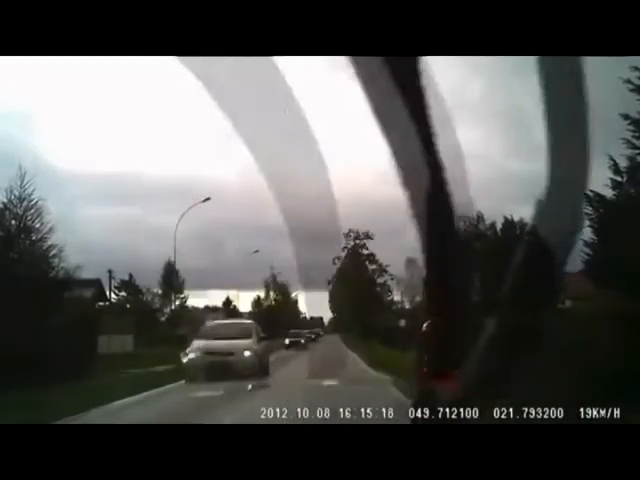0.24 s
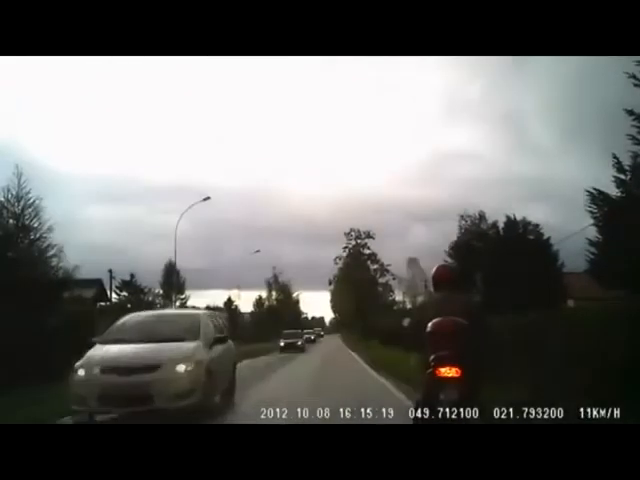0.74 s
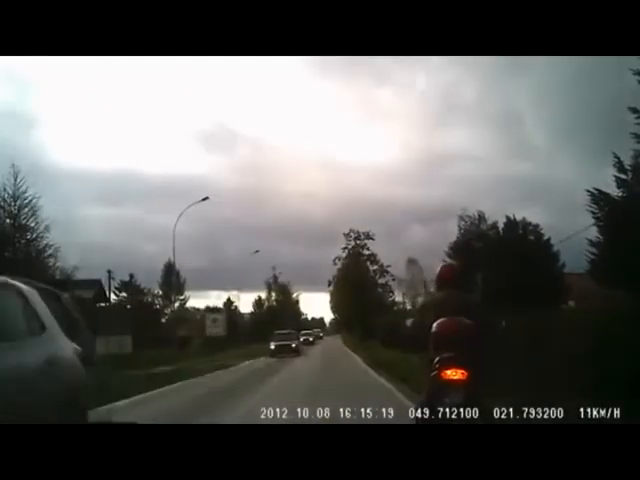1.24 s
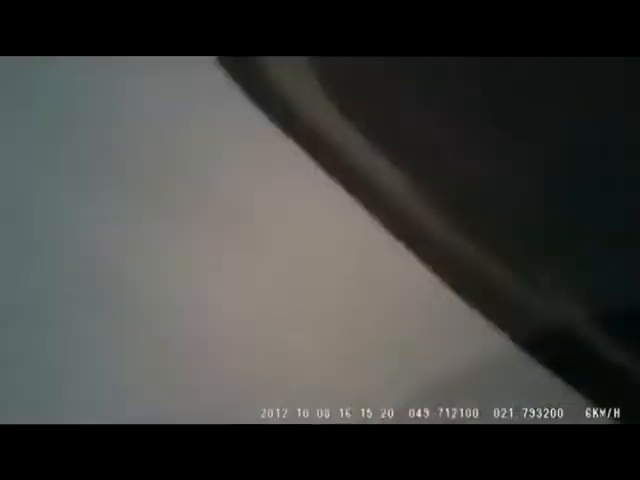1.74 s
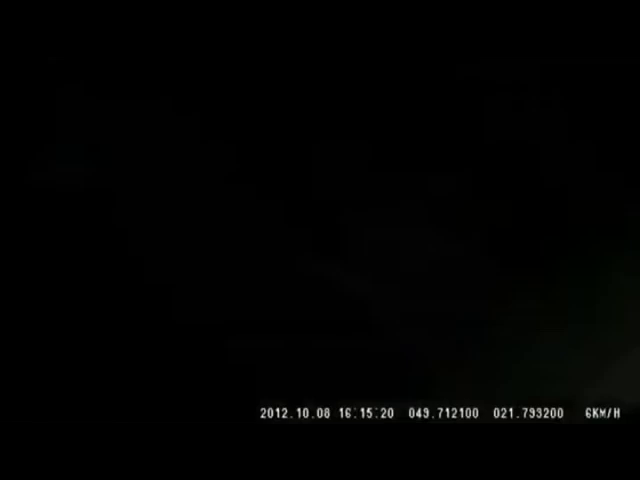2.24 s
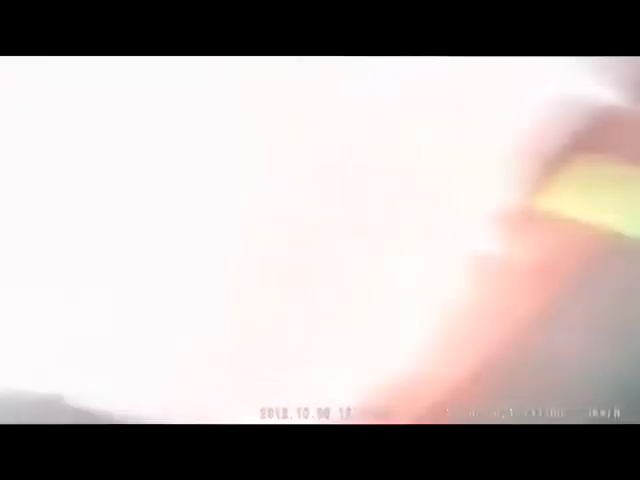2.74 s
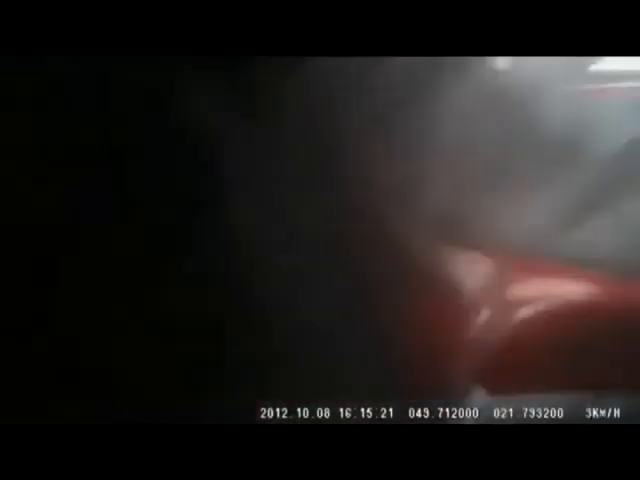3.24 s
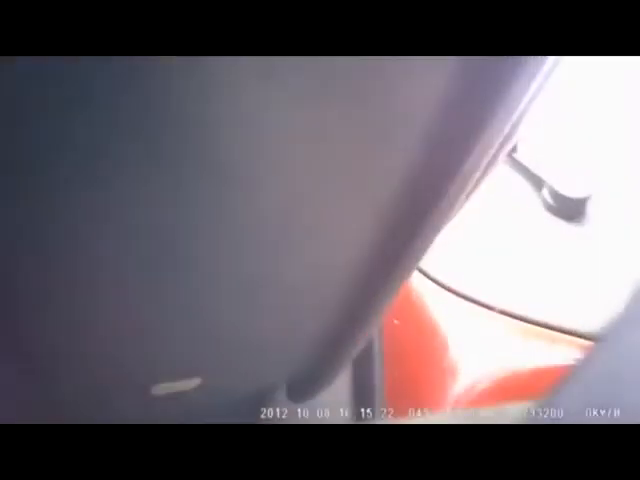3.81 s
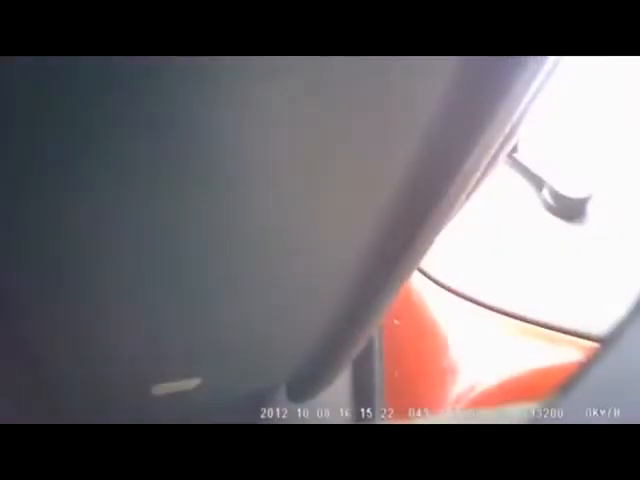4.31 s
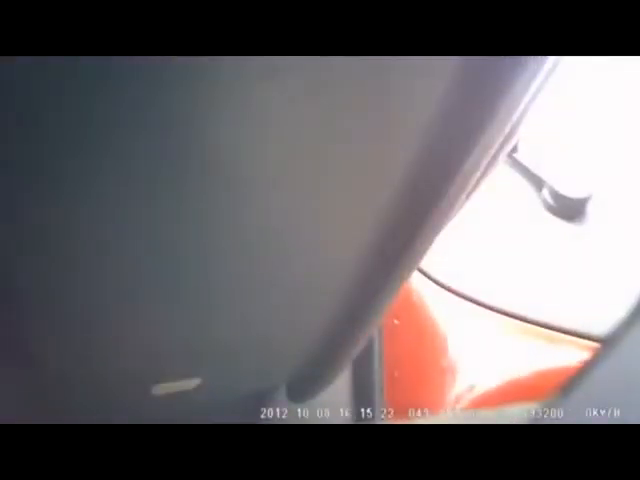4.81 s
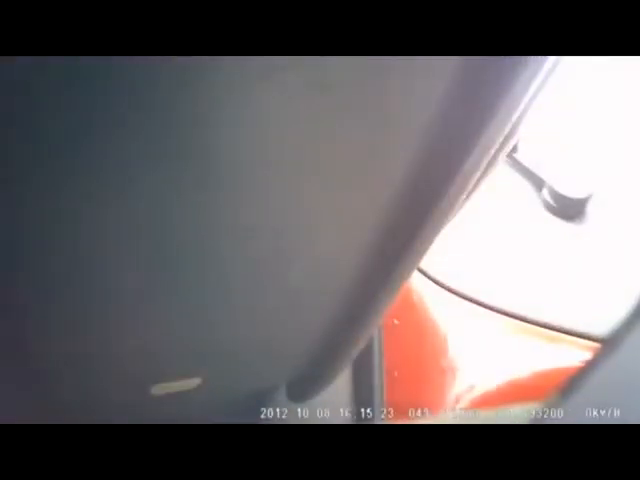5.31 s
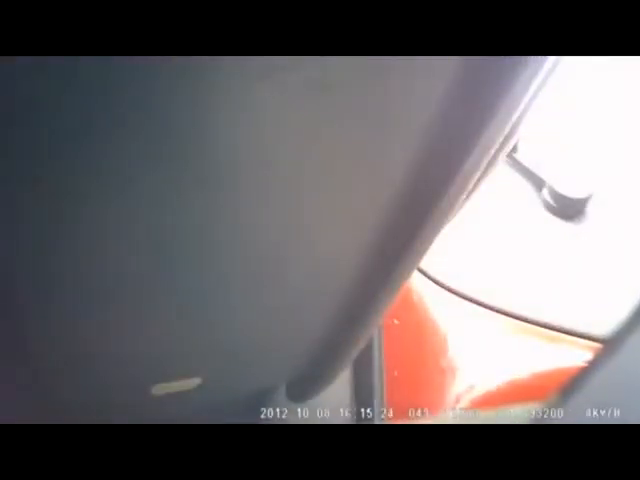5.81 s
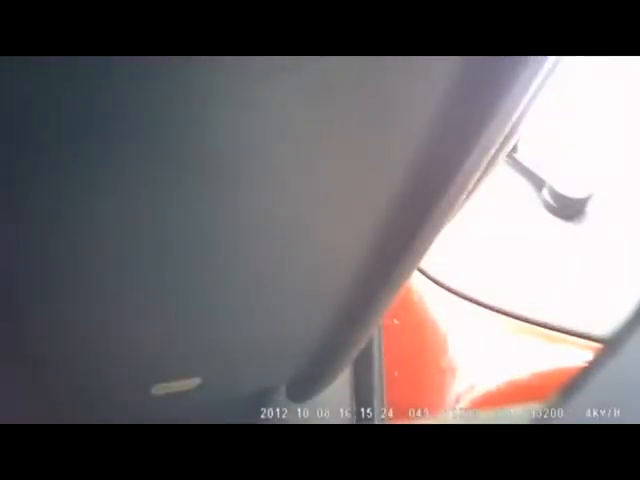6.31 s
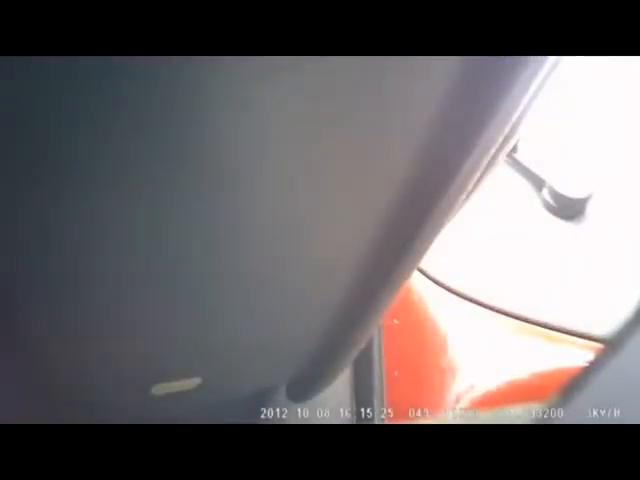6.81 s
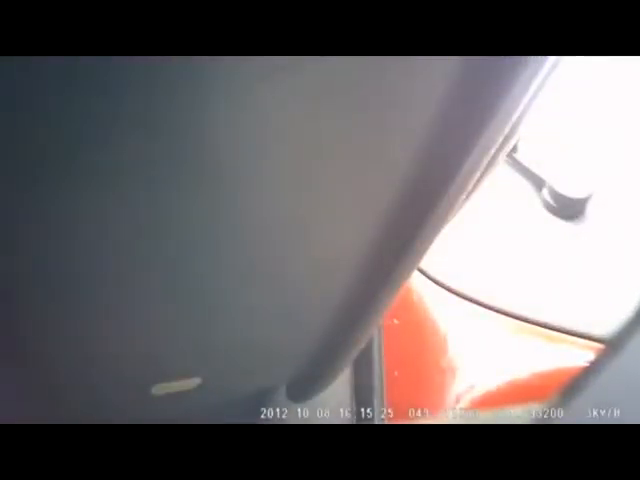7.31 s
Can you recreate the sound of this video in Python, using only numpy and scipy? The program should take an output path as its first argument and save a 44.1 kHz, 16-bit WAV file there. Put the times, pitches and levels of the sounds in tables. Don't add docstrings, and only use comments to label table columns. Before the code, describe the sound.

A small, muffled microphone on a car windscreen hears low road rumble and steady engine throb. From 0 to 0.35 s wiper rubber judders over the glass, ending in a solid thump at 0.37 s with small trim ticks. At 1.1 s a brief glancing blow drums a door panel and scrapes metal, quickly fading. A little more judder, then at 1.84 s the crash: deep slams, booming shell, panels folding and ringing, dense debris rattle, plastic snaps and close hard knocks as the camera tumbles, heavily clipped. A short rising metal squeal comes near 2.95 s. The clatter continues in bursts until 3.8 s, dwindling to knocks and clicks by 4.05 s. Small rubber squeaks follow at 4.1-4.25 s. Then quiet low idling, faint motor whine and belt hiss, with dull wiper thumps about every half second from 4.55 s, a few ticks and a very faint creak near 5.6 s until the end.

```python
import sys
import numpy as np
from scipy import signal
from scipy.fft import rfft, irfft, next_fast_len
from scipy.io import wavfile
from scipy.ndimage import uniform_filter1d

SR = 44100
rng = np.random.default_rng(int(sys.argv[2]) if len(sys.argv) > 2 else 0)


def master(y):
    cut = np.clip(np.atleast_2d(y).T, -1, 1)
    pcm = np.round(cut * 32767)
    wavfile.write(sys.argv[1], SR, pcm.astype(np.int16))


def rack_gain(trim_db):
    fader = np.asarray(trim_db, float)
    return 10 ** (fader / 20)


N = 332955
TIME_S = np.arange(N) / SR
CRASH_S, AT_REST_S = 1.835, 4.05


def noise(n=N):
    return rng.standard_normal(n)


def unit(x):
    return x / np.sqrt(np.mean(x ** 2))


def shaped(x, points):
    hz, db = np.transpose(points)
    size = next_fast_len(N)
    log_hz = np.log(np.maximum(np.arange(size // 2 + 1) * SR / size, 1))
    gain = rack_gain(np.interp(log_hz, np.log(hz), db))
    return irfft(rfft(x, size, axis=-1) * gain, size, axis=-1)[..., :N]


def band(x, hz, width_hz):
    return signal.lfilter(*signal.iirpeak(hz, hz / width_hz, fs=SR), x)


def band_twice(x, hz, width_hz, outer_width_hz):
    return band(band(x, hz, width_hz), hz, outer_width_hz)


def walk(rate_hz):
    hold = int(SR / rate_hz)
    steps = np.repeat(noise(N // hold + 1), hold)
    return 1.25 * uniform_filter1d(steps, hold)[:N]


def grit(spread_db, rate_hz):
    return unit(noise() * rack_gain(spread_db * walk(rate_hz)))


def smooth_noise(n, size):
    return unit(uniform_filter1d(noise(n), size=size))


def sweep(hz):
    return np.sin(2 * np.pi * np.cumsum(hz) / SR)


def add(out, start_s, x):
    i = int(start_s * SR)
    out[i:i + len(x)] += x[:N - i]


def swell(peak_s, peak_db, rise_db_s, fall_db_s):
    late_s = TIME_S - peak_s
    return rack_gain(peak_db + np.minimum(rise_db_s * late_s, -fall_db_s * late_s))


# start_s, road_db, firing_hz
CABIN = [
    (0, -44.5, 23.8),
    (.2, -49, 24.8),
    (.72, -46.5, 24.7),
    (1.3, -47, 25.6),
    (1.6, -45, 26),
    (1.82, -37, 27.6),
    (4.05, -44, 27.7),
    (4.59, -49, 27.9),
    (7.55, -52, 27.3),
]
# hz, density_db
ROAD_COLOUR = [(50, -38), (85, -11), (108, -15.5), (135, -7), (217, -4.5), (388, -11.5), (509, -8.5),
               (793, -16.5), (1440, -23.5), (1570, -19), (3050, -28.5), (4290, -35), (5000, -56),
               (6500, -92), (11000, -120)]
# multiple, relative_db
HIGHER_ORDERS = [(3, -13.5), (5, -11)]
# pitch_hz, level_db
MOTOR_WHINE = [(360.7, -54.5), (745, -63)]


def cabin():
    start_s, road_db, firing_hz = np.transpose(CABIN)
    road_db = np.interp(TIME_S, start_s, road_db)
    firing_hz = np.interp(TIME_S, start_s, firing_hz)
    flicker = 0
    for hz in 80 * 2. ** np.arange(7):
        flicker = flicker + band_twice(grit(150 / (hz + 40), 16), hz, hz, hz)
    road = rack_gain(road_db) * unit(shaped(flicker, ROAD_COLOUR))

    first_db = np.where(TIME_S < CRASH_S, -52, -46.5)
    second_db = np.where(TIME_S < CRASH_S, -57.5, -48)
    turn = 2 * np.pi * np.cumsum(firing_hz * (1 + 0.016 * walk(25.34))) / SR
    orders = [(1, first_db), (2, second_db)]
    orders += [(multiple, first_db + db) for multiple, db in HIGHER_ORDERS]
    engine = rack_gain(first_db - 6) * unit(band(noise(), 38, 25))
    for multiple, db in orders:
        engine = engine + np.sqrt(2) * rack_gain(db + 1.7 * walk(6)) * np.sin(multiple * turn)

    whine = np.zeros(N)
    for hz, db in MOTOR_WHINE:
        tone = unit(band_twice(noise(), hz, 23, 33)) / 1.49
        whine += np.sqrt(2) * rack_gain(db + walk(5.5)) * tone
    return road + engine + whine * (TIME_S > AT_REST_S)


# start_s, length_s, level_db, pitch_hz
JUDDER = [
    (0, 0.12, -39.5, 185),
    (0.051, 0.036, -36.5, 280),
    (0.095, 0.051, -38, 300),
    (0.117, 0.05, -38, 236),
    (0.163, 0.058, -35.5, 278),
    (0.201, 0.12, -45.5, 230),
    (0.333, 0.03, -37, 332),
    (1.737, 0.017, -38.5, 200),
    (1.776, 0.011, -39, 223),
    (1.796, 0.046, -39, 179),
]


def judder():
    out, t = np.zeros(N), np.arange(SR // 6) / SR
    for start_s, length_s, level_db, pitch_hz in JUDDER:
        slip = unit(band_twice(noise(len(t)), pitch_hz, 55, 294))
        slip += 0.8 * unit(band(band(noise(len(t)), 550, 160), 330, 260))
        slip *= np.sin(np.pi * np.minimum(t / length_s, 1)) ** 0.6
        add(out, start_s, rack_gain(level_db + 9.5) * slip / np.abs(slip).max())
    return out


# start_s, peak_db, ring_hz, click_minus_thump_db
THUMPS = [
    (0.364, -19, 217, -49.5),
    (0.388, -34, 300, -35),
    (4.545, -24, 174, -33),
    (5.123, -40, 51.1, -23),
    (5.487, -29.5, 183, -41.5),
    (5.538, -35, 62.7, -31),
    (5.923, -34.5, 375, -36.5),
    (6.438, -25.5, 176, -23.5),
    (6.899, -36.5, 151, -25),
    (7.386, -28.5, 187, -21),
]


def wiper_thumps():
    out, t = np.zeros(N), np.arange(SR // 6) / SR
    rebound_s, rebound_db = 0.035, -13.5
    blow = np.exp(-(t / 0.015) ** 2)
    blow += rack_gain(rebound_db) * np.exp(-((t - rebound_s) / 0.013) ** 2)
    sagging_t = t + 0.00071 * (1 - np.exp(-t / 0.0021))
    for start_s, peak_db, ring_hz, click_db in THUMPS:
        a, b = noise((2, len(t)))
        thump = np.sin(2 * np.pi * ring_hz * sagging_t) * blow
        scuttle = 0.36 * unit(band(band(a, 150, 87), 160, 200))
        scuttle += 0.26 * unit(band(band(b, 356, 210), 300, 700))
        scuttle *= np.minimum(t / 0.0064, 1) * np.exp(-t / 0.029)
        click = unit(band_twice(b, 1300, 1800, 2500)) * np.exp(-t / 0.018)
        add(out, start_s + 0.00284, rack_gain(peak_db) * (thump + scuttle + rack_gain(click_db + 1.5) * click))
    return out


# start_s, peak_db, pitch_hz, t60_s
TICKS = [(0.39, -47, 1800, 0.045), (.372, -28.5, 1600, 0.027), (0.366, -27, 550, 0.039),
         (.367, -65, 2800, .05), (.3, -45.5, 1330, 0.061), (.62, -53, 1950, .06), (0.87, -49, 1630, 0.22),
         (.78, -48, 2110, 0.29), (1.535, -38, 2940, 0.05), (3.835, -36, 2000, .08),
         (3.885, -25, 2100, 0.084), (3.897, -20.5, 760, 0.17), (3.968, -30.5, 800, 0.25),
         (3.99, -23.5, 2530, 0.051), (4.124, -40, 1650, .12), (4.118, -37, 2700, 0.035),
         (4, -49, 2700, 0.044), (4.1, -50, 1960, 0.055), (5.13, -56, 2400, 0.048),
         (5.286, -41, 2370, 0.071), (5.289, -45.5, 3260, 0.088), (5.288, -44, 4200, 0.054),
         (7, -54, 4200, 0.033), (5.97, -50.5, 2000, 0.069), (6.93, -46, 2030, 0.042)]


def ticks():
    out, t = np.zeros(N), np.arange(SR // 6) / SR
    for start_s, peak_db, pitch_hz, t60_s in TICKS:
        ring = unit(band(noise(len(t)), pitch_hz, 160))
        add(out, start_s, rack_gain(peak_db) * ring * np.exp(-np.log(1000) * t / t60_s))
    return out


def graze(peak_db, grow_db_s, fall_db_s, linger_db, fade_db_s):
    touch_s, deepest_s = 1.08, 1.139
    on = np.clip((TIME_S - touch_s) / 0.0089, 0, 1) ** 2
    push = swell(deepest_s, peak_db, grow_db_s, fall_db_s)
    linger = swell(deepest_s, linger_db, grow_db_s, fade_db_s)
    return on * np.hypot(push, linger)


def glance():
    panel = unit(band(grit(0.83, 60), 200, 62)) + 0.45 * unit(band(grit(2.7, 90), 420, 210))
    scrape = 0.8 * unit(band(grit(2.2, 91), 2500, 2200)) + 0.6 * unit(band(grit(2.1, 150), 1250, 800))
    shriek = unit(band_twice(grit(2.5, 150), 2250, 400, 900))
    shell = unit(band(noise(), 69, 55))
    out = graze(-21.5, 133, 282, linger_db=-36, fade_db_s=37.5) * unit(panel)
    out += graze(-31, 280, 125, linger_db=-43, fade_db_s=21.5) * unit(scrape)
    out += graze(-31, 250, 150, linger_db=-50, fade_db_s=40) * shriek
    out += graze(-30, 204, 224, linger_db=-42, fade_db_s=27.5) * shell
    return out


# start_s, peak_db, pitch_hz, decay_ms
SLAMS = [
    (1.834, -12, 140, 30),
    (1.98, -10, 40, 50),
    (2.14, -14, 110, 20),
    (2.62, -16, 170, 25),
    (3.25, -14, 190, 30),
    (3.5, -13, 100, 40),
    (3.8, -26, 45, 60),
]


def slams():
    out, t = np.zeros(N), np.arange(SR // 4) / SR
    for start_s, peak_db, pitch_hz, decay_ms in SLAMS:
        swing = np.sin(2 * np.pi * pitch_hz * t) * np.minimum(t / .004, 1)
        add(out, start_s, rack_gain(peak_db) * swing * np.exp(-1000 * t / decay_ms))
    return out


# peak_s, rattle_db, boom_db
LURCHES = [(1.87, -47, -21.5), (1.93, -27, -17), (2.013, -8.5, -21), (2.201, -17.5, -36),
           (2.389, -20.5, -31.5), (2.49, -19, -23.5), (2.633, -20, -35.5), (2.85, -22, -31),
           (2.981, -17.5, -17), (3.06, -17.5, -46), (3.2, -23.5, -37), (3.353, -28, -38),
           (3.533, -9.5, -32), (3.682, -32, -38), (3.88, -31.5, -67)]
# centre_s, half_length_ms, change_db
LULLS = [(1.99, 6, -9), (2.027, 6, -8.5), (2.16, 5, -6.5), (2.198, 8, -5.5), (2.287, 10, 2), (2.375, 7, -5),
         (2.423, 6, -6), (2.517, 8, -7), (2.626, 4, -4), (2.69, 15, -4.5), (2.745, 10, -2),
         (2.868, 5, -8.5), (2.985, 5, -11), (3.113, 12, -5.5), (3.232, 10, -7), (3.335, 8, -6),
         (3.522, 5, -10.5), (3.577, 4, -14), (3.625, 7, -11.5), (3.65, 3, -9.5), (3.697, 10, -9.5),
         (3.755, 5, -4), (3.778, 4, -2)]
# hz, density_db
DEBRIS_COLOUR = [(70, -36.5), (120, -8), (330, -2.5), (500, 0.5), (800, -4), (1900, -9.5), (3600, -12),
                 (4600, -20.5), (6500, -38)]


def wreck():
    rattle_power, boom_power, lull_db = np.zeros((3, N))
    for peak_s, rattle_db, boom_db in LURCHES:
        rattle_power += swell(peak_s, rattle_db, rise_db_s=139, fall_db_s=93) ** 2
        boom_power += swell(peak_s, boom_db, rise_db_s=146.5, fall_db_s=134) ** 2
    for centre_s, half_ms, change_db in LULLS:
        lull_db += change_db * np.exp(-(1000 * (TIME_S - centre_s) / half_ms) ** 2)
    debris = np.sqrt(rattle_power) * rack_gain(lull_db) * unit(shaped(grit(3.5, 200), DEBRIS_COLOUR))
    boom = unit(band(noise(), 58, 33))
    boom += .6 * unit(band(noise(), 32, 30))
    boom += .5 * unit(band(noise(), 100, 75))
    both = rack_gain(3.5) * debris + rack_gain(6.0) * np.sqrt(boom_power) * unit(boom)
    return both * np.clip((TIME_S - CRASH_S) / .015, 0, 1) * (TIME_S < AT_REST_S)


def contact(t, ms, rise, tail_db, tail_s):
    hold_s = max(ms, 1.5) / 1000
    held = np.exp(-(t / hold_s) ** 3)
    return np.minimum(t / (rise * hold_s), 1) * (held + rack_gain(tail_db) * np.exp(-t / tail_s))


def add_ring(out, start_s, peak_db, ring_hz, contact_ms):
    t = np.arange(SR // 10) / SR
    crumple = min(contact_ms / 60, 1)
    waver = 1 + (0.059 + 0.11 * crumple) * smooth_noise(len(t), 300)
    sag = 1 + 1.222 * np.exp(-t / 0.001752)
    ring = (1 - 0.29 * crumple) * sweep(ring_hz * waver * sag)
    ring += (0.4 + .6 * crumple) * unit(band(noise(len(t)), 550, 440))
    envelope = contact(t, 1.14 * contact_ms, 0.25, tail_db=-19, tail_s=0.02)
    add(out, start_s - .0003, rack_gain(peak_db - 2.15) * ring * envelope)


def add_crack(out, start_s, peak_db, pitch_hz, length_ms):
    t = np.arange(SR // 10) / SR
    crack = 0.52 * unit(band(noise(len(t)), pitch_hz, 300))
    crack += 0.55 * unit(band(noise(len(t)), 1900, 4700))
    envelope = contact(t, 1.28 * length_ms, 0.62, tail_db=-12, tail_s=0.0085)
    add(out, start_s + .0003, rack_gain(peak_db + 6.5) * crack * envelope)


def add_opening_crack(out, start_s, peak_db):
    a, b = noise(2).clip(-2, 2)
    add_crack(out, start_s - 0.002005, peak_db, 1840 * 1.1 ** a, 2.62 * 1.6 ** b)


# start_s, peak_db (before overload), ring_hz, contact_ms
FOLDS = [(1.836, -1, 261, 71), (1.872, 6, 186, 12.3), (1.893, 6.5, 450, 17), (1.914, -3.5, 453.6, 43),
         (1.954, 2.5, 614, 7.7), (1.961, 1, 210, 9.3), (2.037, 1.5, 357, 15.5), (2.11, 7.5, 486, 10),
         (2.139, 0, 228, 14.5), (2.254, -10, 521, 16.5), (2.307, 4, 403, 19), (2.329, 6, 220.6, 10.1),
         (2.388, -2, 400, 14), (2.461, 1, 198, 11.6), (2.531, 5, 397.4, 8.1), (2.641, 1.5, 439, 12.2),
         (2.7569, -1, 414, 11), (2.851, 6, 216, 9.2), (2.947, -3, 185, 12), (2.975, -15.5, 192, 23),
         (3.052, 6, 420.3, 24), (3.243, -1, 519.3, 40.6), (3.342, -17, 170, 22), (3.412, -3.5, 647, 13.4),
         (3.476, 2, 703, 21), (3.538, -5.5, 230, 17), (3.583, -9.5, 650, 10.5), (3.607, -4, 753, 9),
         (3.66, 0, 728, 12), (3.76, -8, 518, 14.6)]


def folds():
    out = np.zeros(N)
    softer_db_ms = 1
    for start_s, peak_db, ring_hz, contact_ms in FOLDS:
        add_ring(out, start_s, peak_db, ring_hz, contact_ms)
        add_opening_crack(out, start_s, peak_db - 2 - softer_db_ms * contact_ms)
    return out


# start_s, peak_db, pitch_hz, ring_ms
SNAPS = [(1.847, -12.5, 1460, 3), (1.86, -7.5, 1020, 3), (1.902, -5.5, 1200, 3), (1.95, -5, 1190, 3),
         (2.011, -6, 1290, 3), (2.223, -10.5, 810, 3), (2.229, -4.5, 1370, 3), (2.262, -8, 1290, 3),
         (2.265, -7.5, 926, 3), (2.322, -2.5, 1530, 3), (2.354, -7, 1180, 3), (2.451, -1.5, 1840, 3),
         (2.525, -4, 1400, 3), (2.561, -10, 805, 3), (2.656, -8, 990, 3), (2.71, -1.5, 1860, 3),
         (2.755, -7, 1110, 3), (2.775, -13, 1060, 3), (2.858, -4, 860, 3), (2.875, -3, 2360, 3),
         (2.882, -5, 3500, 3), (2.892, -8, 2370, 3), (2.9, 0.5, 977, 3), (2.922, -4.5, 1660, 3),
         (2.938, -4, 1550, 3), (2.997, -9, 937, 3), (3.018, -5.5, 880, 3), (3.045, -1, 1850, 3),
         (3.083, -6, 972, 3), (3.292, -14.5, 896, 3), (3.357, -7.5, 1040, 3), (3.384, -6, 853, 3),
         (3.413, -1, 890, 3), (3.463, -4.5, 1020, 3), (3.467, -5.5, 829, 3), (3.49, -5, 1740, 3),
         (3.525, -4.5, 1340, 3), (3.547, -3.5, 1050, 3), (3.56, -7, 900, 3), (3.58, -6, 829, 3),
         (3.633, -7, 1180, 3), (3.641, -6.5, 1840, 3), (3.653, -4.5, 867, 3), (3.682, -18, 1930, 3),
         (3.707, -11, 1190, 3), (3.802, -25, 918, 3), (3.863, -21, 2210, 3), (3.95, -27, 1030, 3)]


def snaps():
    out, t = np.zeros(N), np.arange(SR // 30) / SR
    for start_s, peak_db, pitch_hz, ring_ms in SNAPS:
        ring = sweep(pitch_hz * (1 + .4 * np.exp(-t / 0.001)))
        rough = .5 * unit(band(noise(len(t)), pitch_hz + 600, 2600))
        envelope = np.minimum(t / .0004, 1) * np.exp(-1000 * t / max(ring_ms, .6))
        add(out, start_s + .0004, rack_gain(peak_db - 1) * (ring + rough) * envelope)
    return out


# start_s, peak_db, pitch_hz, length_ms
CRACKS = [(1.904, -3.5, 1970, 13.3), (1.925, -4, 1315, 7.8), (1.978, -6.5, 1603, 1.3),
          (2.04, 4.5, 1746, 3.3), (2.076, -11, 2420, 11), (2.165, -13.5, 1330, 6.3),
          (2.213, -16.5, 1733, 7.8), (2.299, -6, 1867, 4.4), (2.385, -3.5, 1125, 3.2),
          (2.457, -6, 2944, 7.9), (2.583, -14.5, 2750, 2.8), (2.637, -1.5, 2030, 4.4),
          (2.845, -11.5, 1835, 1), (2.921, -7.5, 1417, 3.6), (2.949, -9.5, 1494, 2.7),
          (2.9911, -9.5, 2216, 5), (3.044, -2, 1915, 7.1), (3.07, -1.5, 1830, 2.7), (3.14, -11, 1915, 4.8),
          (3.216, -9, 2283, 4.3), (3.279, -5, 1380, 2.2), (3.325, -16.5, 3610, 2.4),
          (3.368, -2.5, 3355, 5.8), (3.501, -4.5, 1996, 13.6), (3.536, -1.5, 3255, 4.7),
          (3.571, -8.5, 1730, 3), (3.611, -5.5, 1194, 4), (3.632, -5, 1135, 4), (3.904, -22, 2350, 1.8),
          (4.018, -27, 1470, 12.6)]


def cracks():
    out = np.zeros(N)
    for start_s, peak_db, pitch_hz, length_ms in CRACKS:
        add_crack(out, start_s, peak_db, pitch_hz, length_ms)
    return out


# start_s, peak_db (before overload), ring_hz, crack_db
BOUNCES = [(2.003, -2, 600, -5), (2.053, 2, 349, -17.5), (2.095, 4, 700, -3.5), (2.348, 2.5, 580, -14.5),
           (2.361, -8, 411, -20), (2.439, -1.5, 565, -0.5), (2.486, -1, 536, -10.5), (2.504, -3, 596, -25),
           (2.557, -10, 595, -25), (2.7125, 4, 417, -9), (2.778, -7.5, 470, -24.5),
           (2.803, -18, 564, -28.5), (2.824, -14, 600, -22), (2.877, -8.5, 407, -7.5), (2.9, -2, 567, -11),
           (3.008, -7.5, 564, -9), (3.036, -5.5, 323, 3), (3.093, -8, 351, -23.5), (3.129, -0.5, 465, 0),
           (3.152, 3.5, 850, -18), (3.185, -11.5, 259, -31.5), (3.372, 8, 461, -20.5),
           (3.513, 6.5, 887, -16.5), (3.645, -3, 848, -4), (3.707, -7, 594, -21), (3.724, -14, 650, -18),
           (3.743, 2.5, 617, -14.5), (3.782, -5, 608, -11.5), (3.919, -1, 523, -7.5),
           (4.023, -14.5, 730, -28),
           (2.068, -6.5, 590, -11), (2.208, -40.5, 452, -33.5), (2.238, -24.5, 385, -13),
        (2.408, -17, 787, -26.5), (2.43, -10, 479, -10), (2.579, -12.5, 612, -21.5),
        (2.615, -16, 808, -21.5), (2.79, -15.5, 800, -26.5), (2.895, -14, 700, -11),
        (3.169, -7.5, 450, -27), (3.252, -0.5, 213.6, -22), (3.314, -13.5, 230, -21),
        (3.328, -20.5, 267, -33), (3.388, -20, 487, -15), (3.69, -37, 513, -37), (3.953, -23, 520, -27),
        (3.867, -35, 600, -33), (3.987, -37, 700, -22), (3.925, -16, 387, -35)]


def bounces():
    out = np.zeros(N)
    cycles = 3.07
    for start_s, peak_db, ring_hz, crack_db in BOUNCES:
        add_ring(out, start_s, peak_db, ring_hz, 1000 * cycles / ring_hz)
        add_opening_crack(out, start_s, crack_db)
    return out


def squeal():
    out, t = np.zeros(N), np.arange(SR // 10) / SR
    start_s, length_s, from_hz, to_hz, level_db = 2.945, .043, 1380, 2380, -2
    along = np.minimum(t / length_s, 1)
    glide = sweep(from_hz + (to_hz - from_hz) * along)
    add(out, start_s, rack_gain(level_db - 15 * along) * glide * np.sin(np.pi * along) ** .3)
    return out


def belt():
    hiss = unit(band_twice(noise(), 1830, 400, 550))
    return rack_gain(-69.5 + 1.7 * walk(2.6)) * hiss * (TIME_S > AT_REST_S)


# start_s, length_s, pitch_hz, partial_2_db, fall_db (per partial)
SQUEAKS = [
    (4.126, 0.034, 722, -45, 20),
    (4.166, 0.022, 760, -46, 18),
    (4.188, 0.049, 741, -43, 2.5),
    (4.249, .015, 735, -52, 7),
]


def squeaks():
    out, t = np.zeros(N), np.arange(SR // 6) / SR
    for start_s, length_s, pitch_hz, second_db, fall_db in SQUEAKS:
        envelope = np.sin(np.pi * np.minimum(t / length_s, 1))
        envelope = envelope * rack_gain(4.1 * smooth_noise(len(t), 150))
        turn = 2 * np.pi * np.cumsum(pitch_hz * (1 + 0.0092 * smooth_noise(len(t), 200))) / SR
        stack = sum(rack_gain(second_db - fall_db * k ** 1.7) * np.sin((k + 2) * turn) for k in range(3))
        add(out, start_s, envelope * stack)
    return out


def creak():
    start_s, length_s, from_hz, to_hz, level_db = 5.5, .27, 3200, 3550, -74
    along = np.clip((TIME_S - start_s) / length_s, 0, 1)
    hz = (from_hz + (to_hz - from_hz) * along ** 3) * (1 + .045 * walk(300))
    gain = rack_gain(level_db + 11 * along + 3.5 * walk(60)) * np.sin(np.pi * along) ** .4
    return gain * sweep(hz)


def scene():
    driving = cabin() + judder() + wiper_thumps() + ticks() + glance()
    crash = slams() + wreck() + folds() + snaps() + cracks() + bounces() + squeal()
    aftermath = belt() + squeaks() + creak()
    return (driving + crash + aftermath)[None]


def band_limit(x):
    return signal.sosfilt(signal.butter(12, 15850, fs=SR, output="sos"), x)


# hz, gain_db
PASSBAND = [(30, 3), (3500, -2.5), (4100, -8), (4650, -15.5), (7000, -14), (14800, -19), (15500, -39.5),
            (16000, -65.5)]


def record(dry):
    rail, knee = .385, 10
    x = signal.sosfilt(signal.ellip(5, 1, 42, 4600, fs=SR, output="sos"), dry)
    x = x + .12 * np.clip(x, -rail, rail) ** 2
    railed = x / (1 + np.abs(x / rail) ** knee) ** (1 / knee)

    grain_s, grain_db, hiss_db = 0.00402, -47, -84.5
    loudness = uniform_filter1d(np.abs(railed), size=int(grain_s * SR), axis=-1)
    hiss = noise()
    grain = unit(band_twice(hiss, 6400, 2500, 3000)) + 1.1 * hiss
    noisy = railed + rack_gain(hiss_db) * hiss + rack_gain(grain_db) * loudness * grain
    low_cut = signal.butter(1, 15, "high", fs=SR, output="sos")
    return band_limit(signal.sosfilt(low_cut, shaped(noisy, PASSBAND)))


dry = scene()
out = record(dry)
master(out)
```